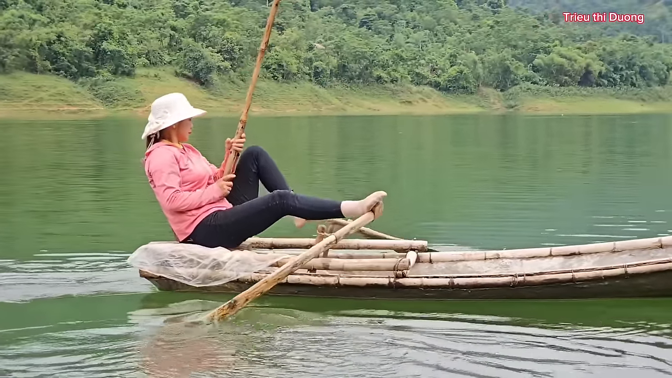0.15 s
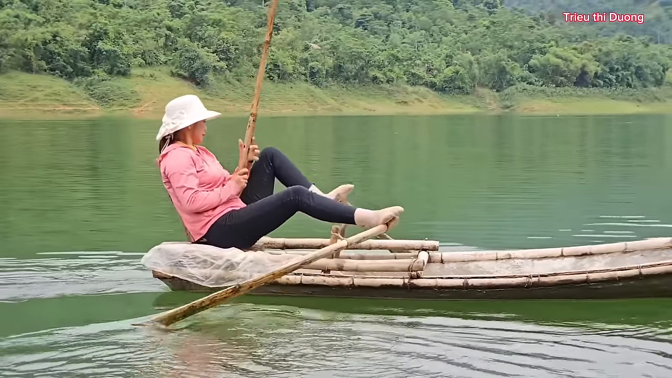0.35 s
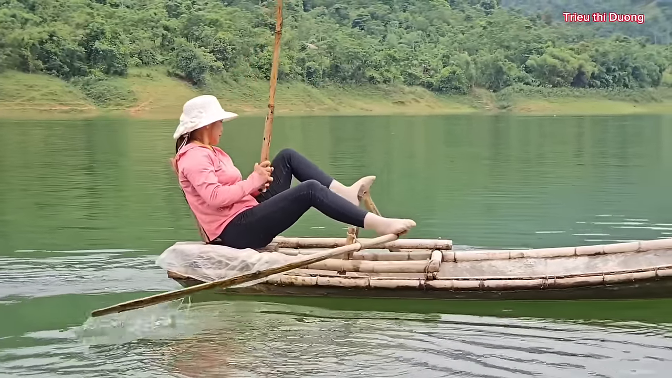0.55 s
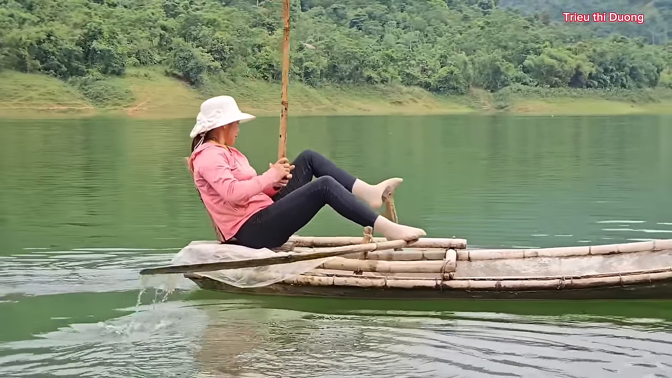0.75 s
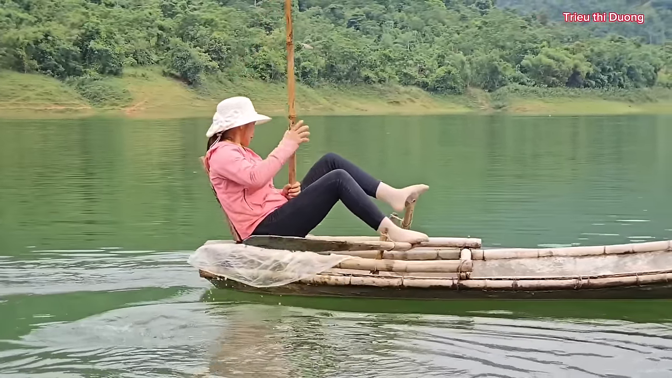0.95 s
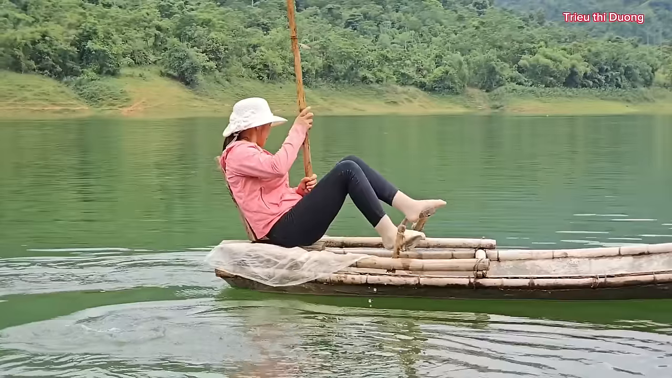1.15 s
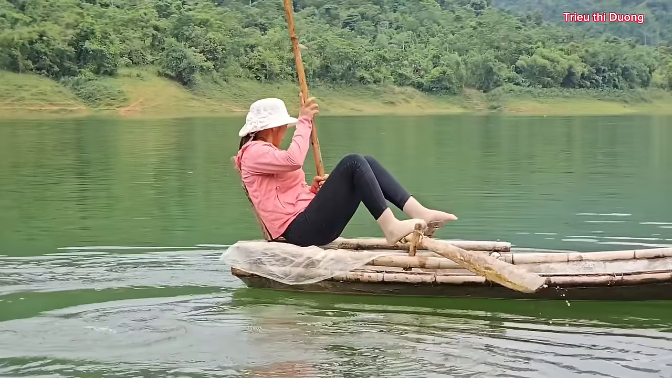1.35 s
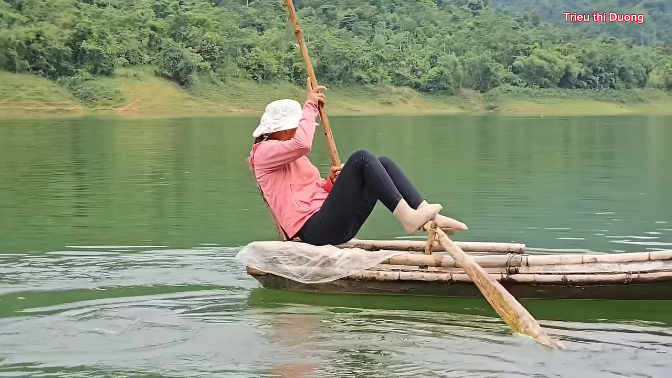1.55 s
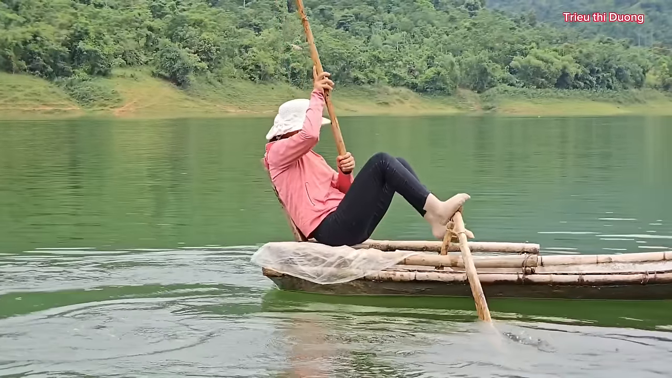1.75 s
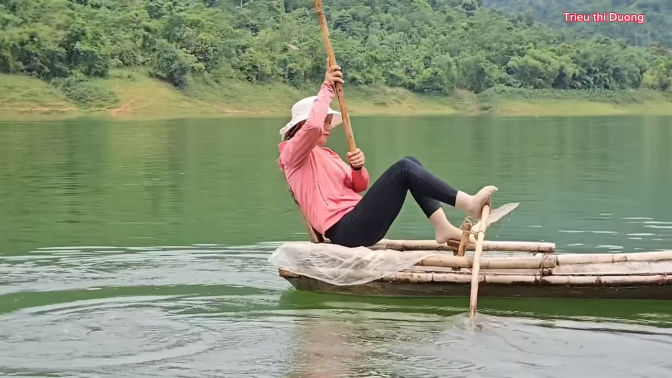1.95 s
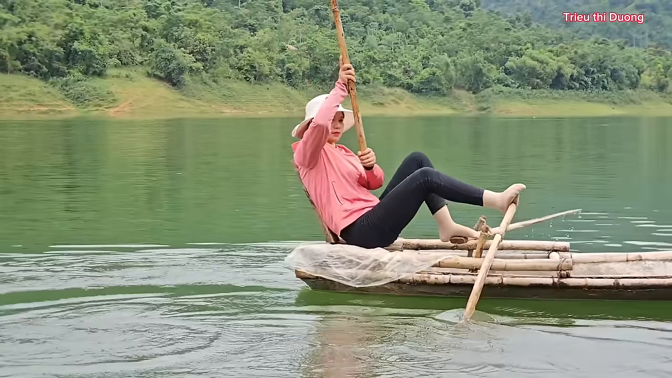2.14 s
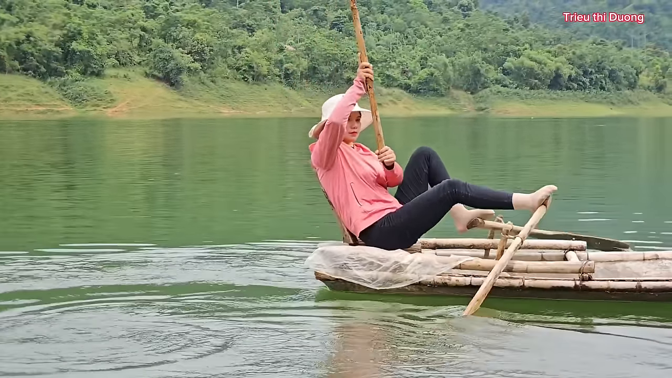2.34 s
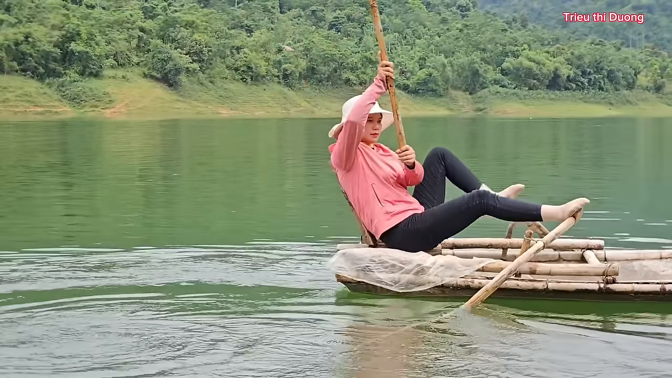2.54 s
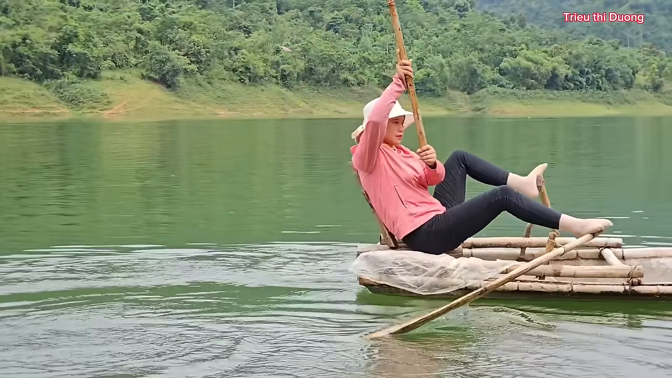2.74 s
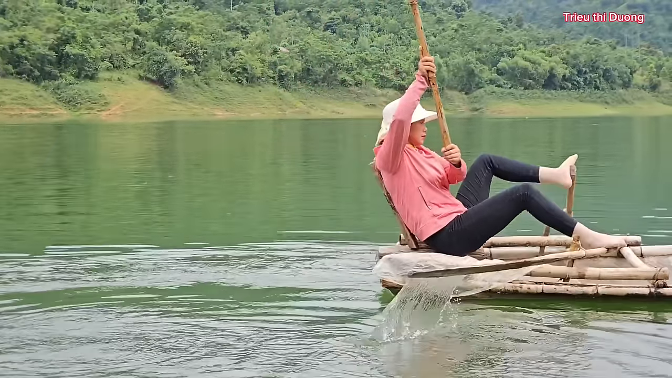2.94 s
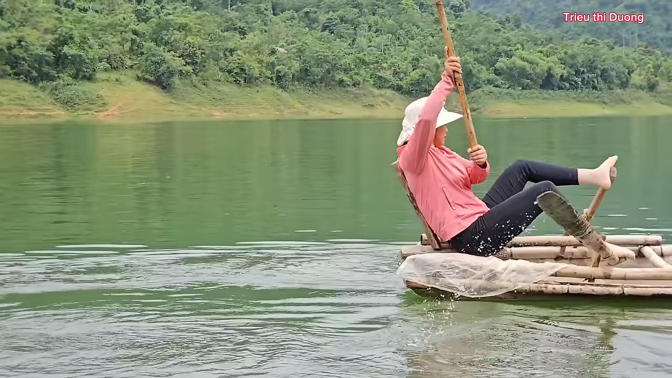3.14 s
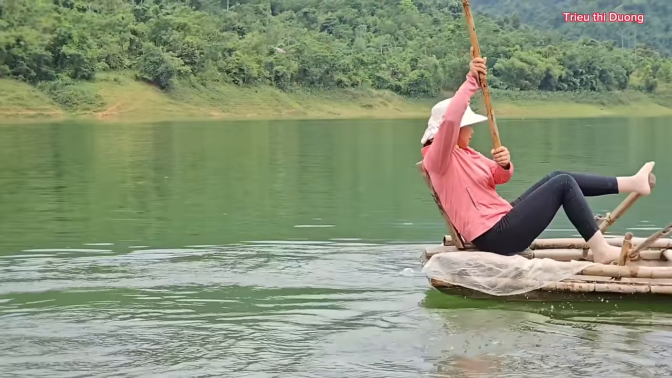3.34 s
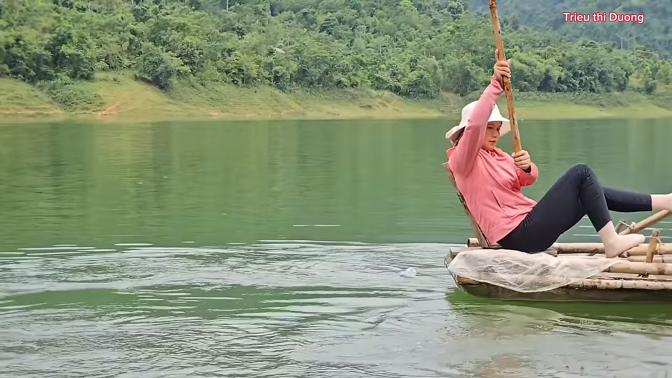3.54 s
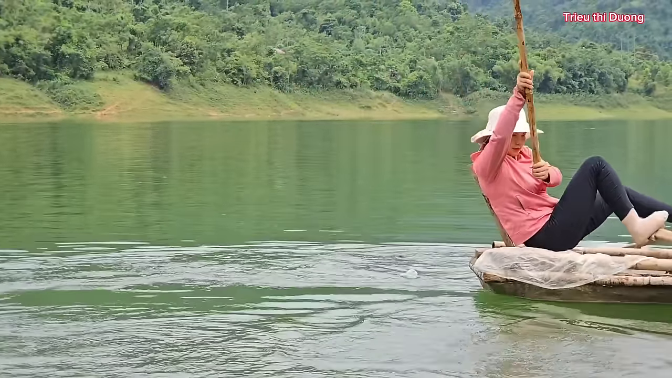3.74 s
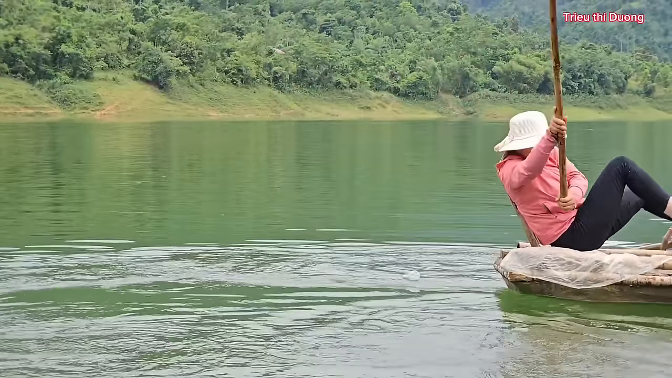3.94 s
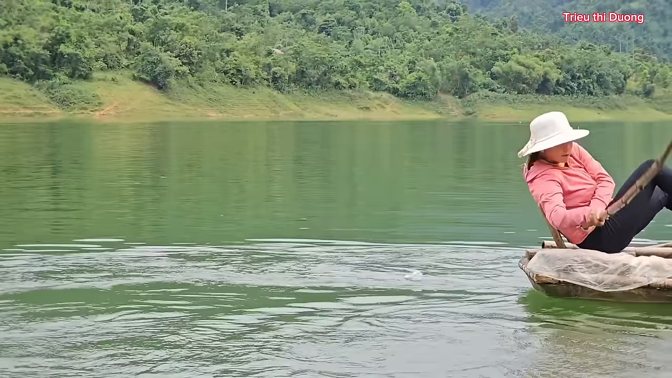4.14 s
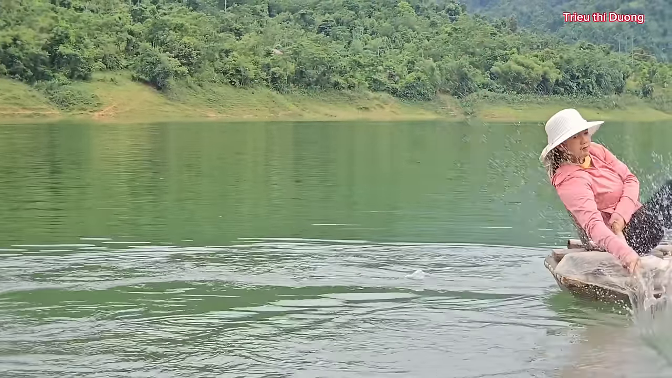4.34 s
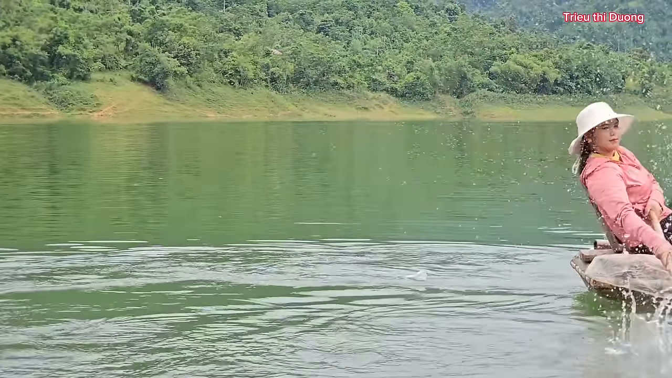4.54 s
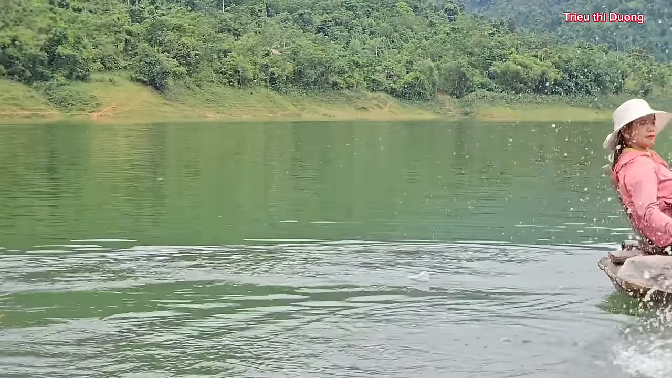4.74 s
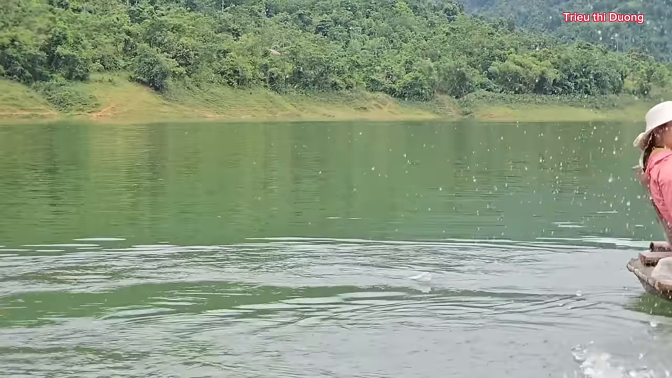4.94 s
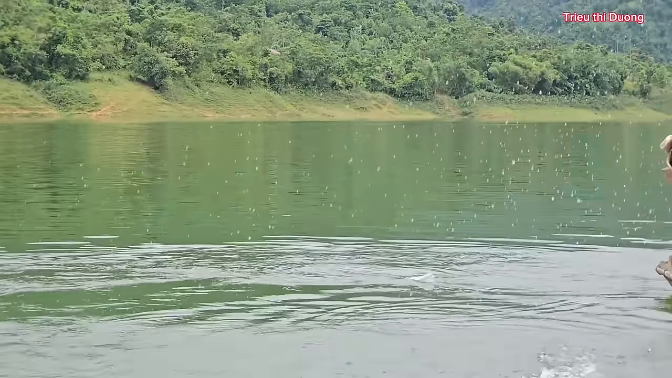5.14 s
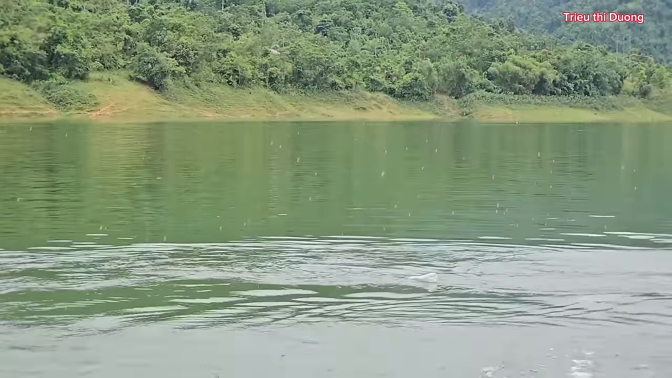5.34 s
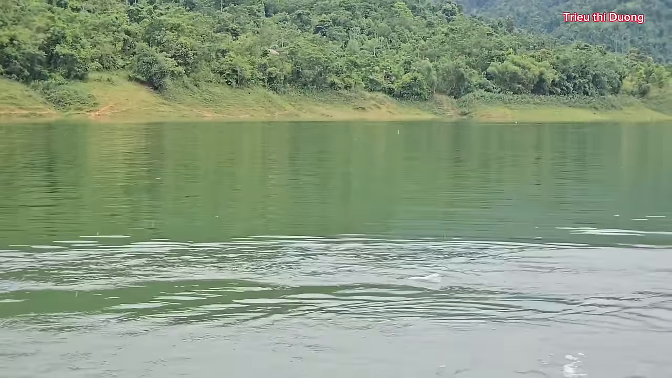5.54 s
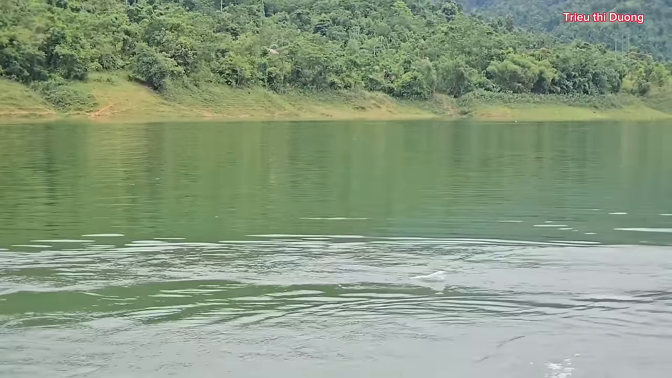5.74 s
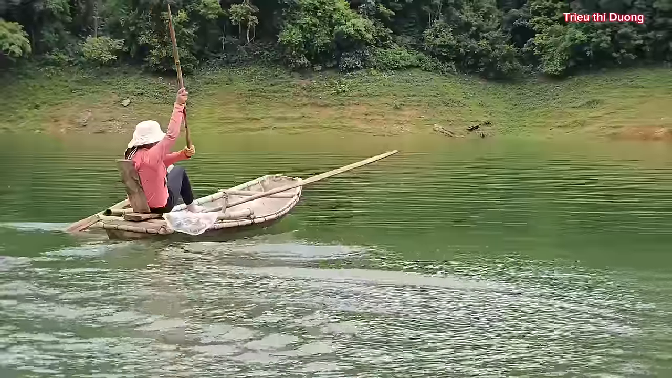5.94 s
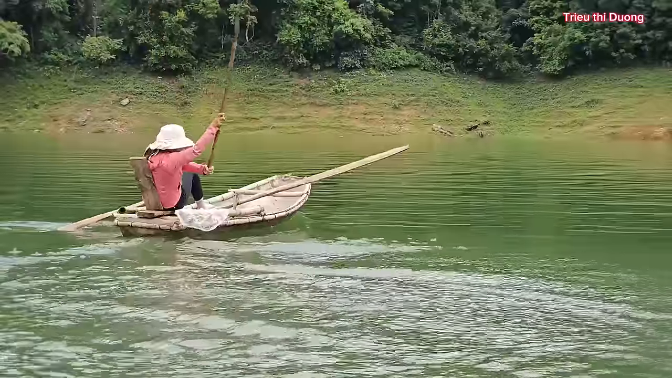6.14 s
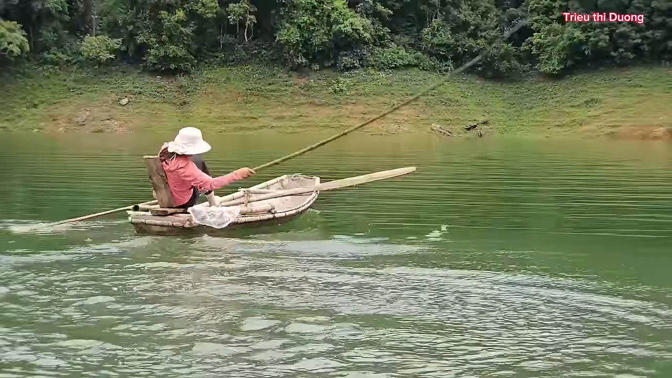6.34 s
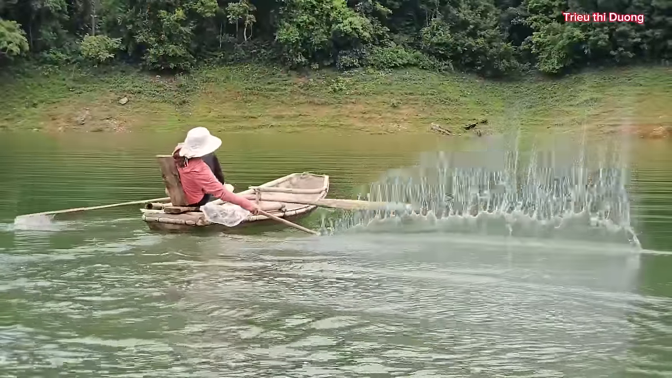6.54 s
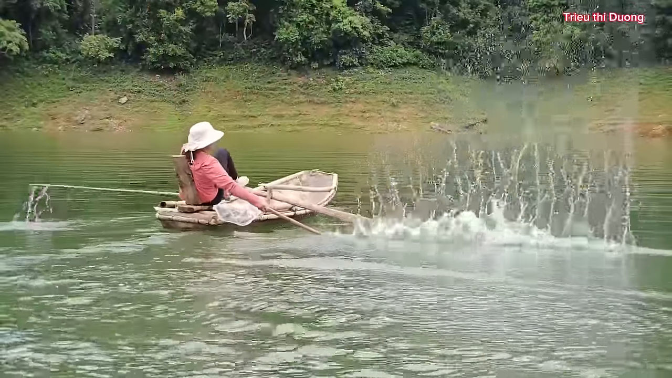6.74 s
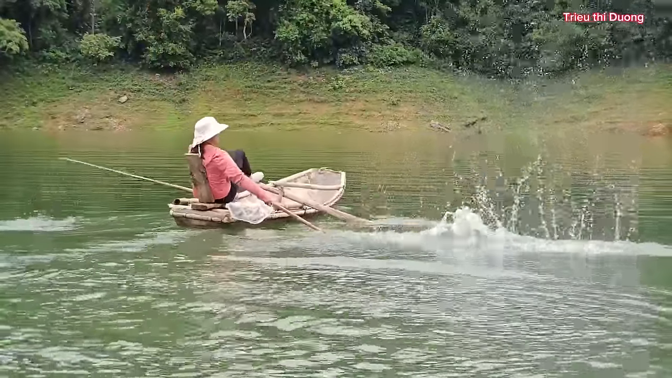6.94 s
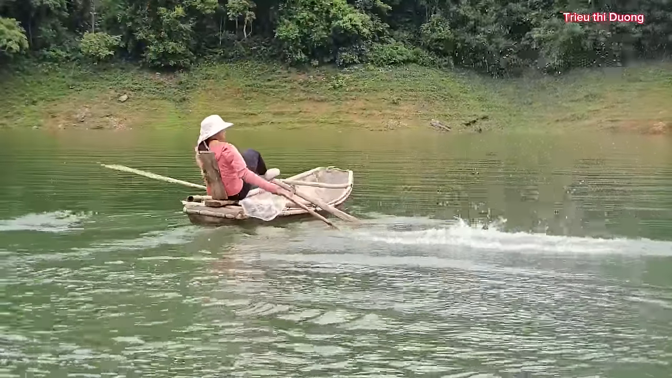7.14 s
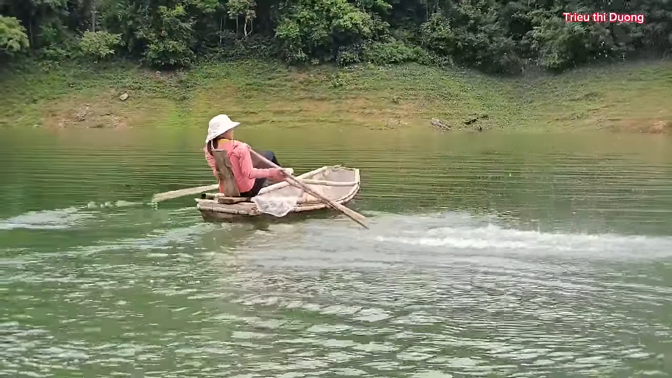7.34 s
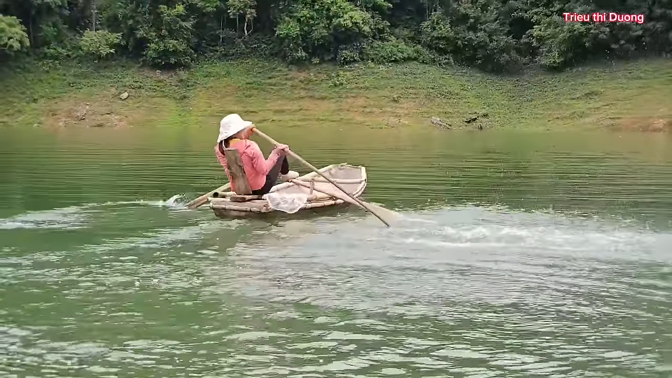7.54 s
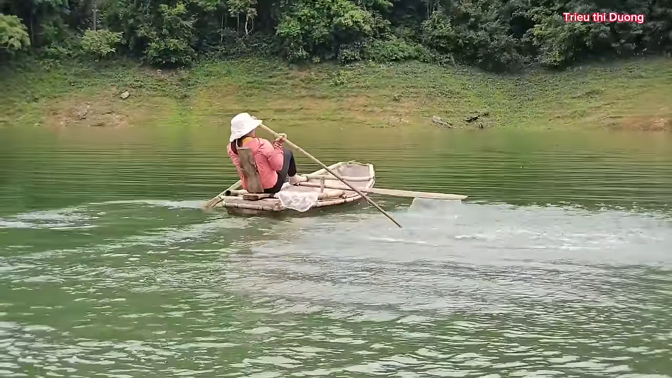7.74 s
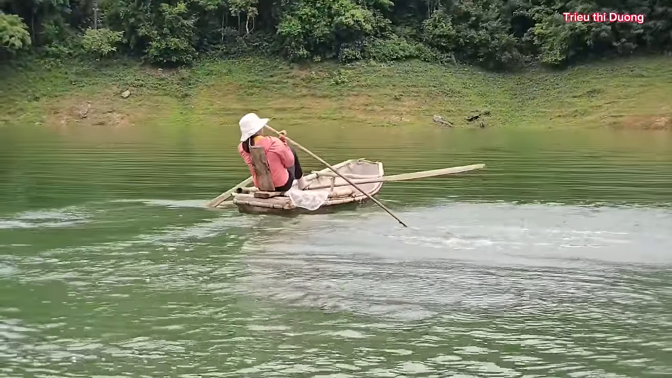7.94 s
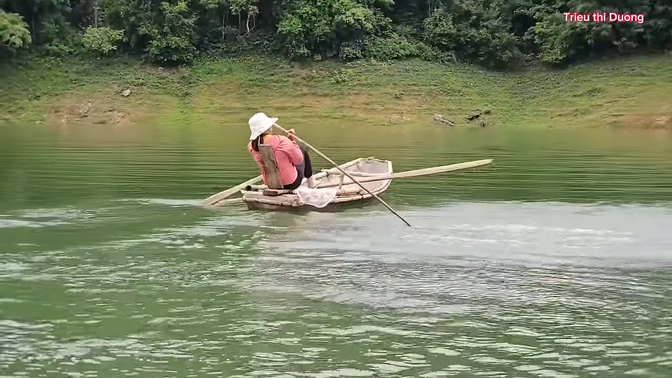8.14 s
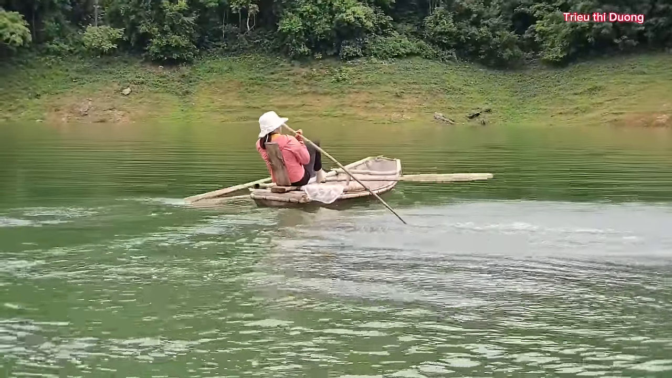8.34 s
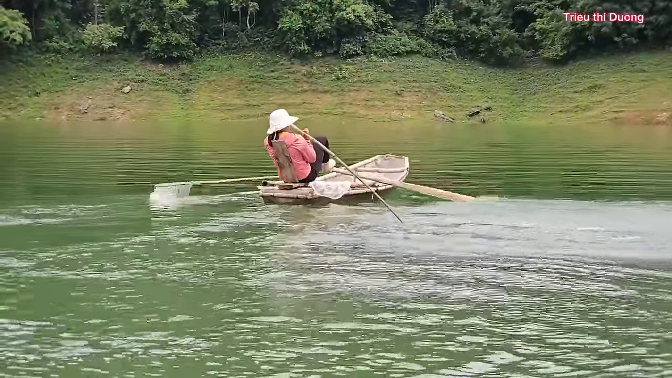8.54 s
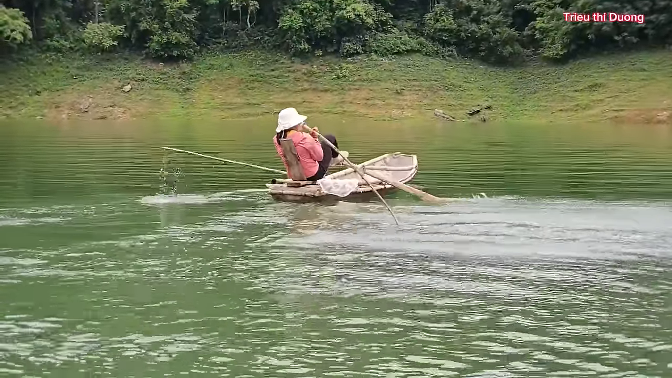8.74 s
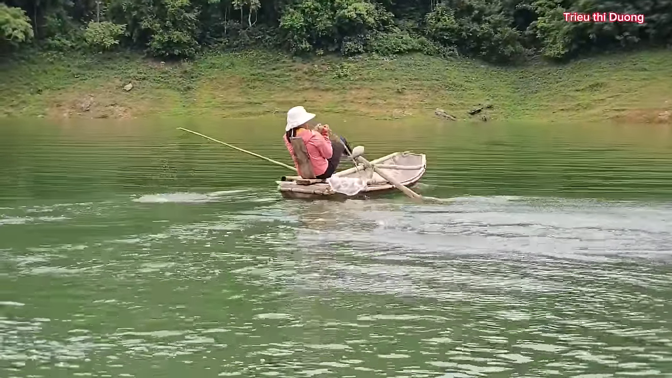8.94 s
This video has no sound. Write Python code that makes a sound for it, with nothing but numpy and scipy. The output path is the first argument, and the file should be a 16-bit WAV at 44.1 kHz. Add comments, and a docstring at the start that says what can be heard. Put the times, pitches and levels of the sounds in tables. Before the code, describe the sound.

Quiet outdoor water ambience: light paddle gurgles, single ringing bubbles and clicking drops, with insects and high birds from a wooded shore. Midway comes a sudden loud slap of a long pole, a hollow gulp and a shower of droplets. A very short total silence separates it from a more distant view, where another slap bursts and showers down before soft oar strokes resume, with slight wind at the microphone.

```python
"""Twice a long bamboo pole beats a calm lake: a swish of eddies, a noise crack, a gulp of air pockets, then spray.
The spray rains back as bubble showers and noise ticks; drops click, and lone bubbles ring as gliding tones.
A small boat is rowed: the water is stirred into showers of bubbles and drips, with short narrow-noise gurgles.
From the wooded shore come insects as coloured noise and thin tones, and small birds as falling chirps.
All sound drops out briefly between the two blows; a faint low knock comes just before that."""
import sys
import numpy as np
from scipy import signal
from scipy.fft import rfft, irfft, next_fast_len
from scipy.io import wavfile

SR = 44100
rng = np.random.default_rng(int(sys.argv[2]) if len(sys.argv) > 2 else 0)


def master(y):
    """Save y as 16-bit WAV."""
    cut = np.clip(np.atleast_2d(y).T, -1, 1)
    pcm = np.round(cut * 32767)  # scale
    wavfile.write(sys.argv[1], SR, pcm.astype(np.int16))


N = 396018
TIME = np.arange(N) / SR

# All colours below: relative noise density, (frequency [Hz], density [dB per Hz])
# the silence: (start [s], end [s])
SILENCE = (5.829, 5.928)
# air and insect chorus before and after the silence: colours
SHORE_BEFORE = [(18, -39.5), (30, -13.5), (110, -1.5), (384, -14), (497, -12), (928, -18.5), (2080, -18),
                (2770, -4.5), (3410, -12), (4650, 3.5), (5730, -12), (7430, -4.5), (9390, -16),
                (10400, -26.5), (15000, -30)]
SHORE_AFTER = [(18, -41), (30, -24.5), (102, 5), (176, -5.5), (267, -2), (346, -12.5), (1650, -8.5),
               (2430, -16.5), (3410, -10.5), (4780, 4.5), (5880, -18), (7430, 1.5), (9890, -26),
               (11300, -18.5), (15000, -28.5)]
# steady breeze: (level before the silence [dB], level after [dB])
BREEZE_DB = (-96, -77.5)
# gusts on the microphone: (time of peak [s], level [dB], width [s])
GUSTS = [(.2, -68.5, .35), (1.3, -79, 0.54), (8.8, -65, 0.14)]
# thin tones of single insects: (time [s], length [s], level [dB], pitch [Hz])
INSECT_TONES = [(0, 0.46, -72, 2740), (1.4, 3.04, -77.5, 2860), (3.303, 0.67, -78.5, 2410)]
# trills of falling chirps: (time [s], chirps [count], level before panning [dB], nominal top pitch [Hz])
TRILLS = [(.71, 4, -62.5, 4650), (1.75, 4, -63, 4750), (2.03, 3, -66, 4500), (2.83, 6, -60.5, 4700),
          (4.05, 3, -63, 4690), (5.929, 1, -48, 4730), (6.999, 6, -52.5, 4700), (8.102, 1, -56, 4750),
          (8.135, 4, -47.8, 4750)]
# a bird's falling whistle: (time [s], level [dB])
WHISTLES = [(-.005, -62), (1.368, -59), (2.665, -60)]
# chorus of far trills, one row before and one after the silence: (mean level [dB], mean top pitch [Hz])
FAR_TRILLS = [(-67, 4880), (-62.5, 5110)]
# swirls behind a blade or the pole: (time [s], length [s], level [dB], first pitch [Hz], last pitch [Hz])
GURGLES = [(0.399, .11, -56, 248.6, 561), (0.713, 0.097, -60.5, 394, 775), (1.68, 0.089, -71, 320, 646),
           (2.189, 0.082, -68.5, 733, 700), (3.41, 0.057, -68, 228, 170), (3.901, 0.063, -71, 330, 400),
           (4.389, .07, -51, 262, 240), (4.481, .13, -52, 230.5, 340), (5.942, 0.056, -67.5, 279, 320),
           (6.204, .08, -59.5, 276, 380), (6.699, .12, -63, 250, 190), (7.723, .11, -64, 500, 750),
           (8.059, 0.072, -70, 278, 378), (8.368, .16, -59.5, 334, 267)]
# stirrings of the water with bubbles and drips, near and far; several may make one stroke;
# levels before the trims in scene():
# (time of full strength [s], hold [s], bubble level [dB], fade [dB per s], drip level [dB])
NEAR_STIRRINGS = [(.135, .05, -64.5, 110.5, -78), (.41, 0.058, -48.5, 44, -65),
                  (1.61, 0.0094, -65, 199, -72.5), (1.70, 0.063, -62.5, 109, -92),
                  (2.505, .045, -60.5, 200, -80), (2.885, .065, -57.5, 75, -71),
                  (3.092, .005, -55, 419.5, -86), (3.205, .01, -64, 299, -74), (3.85, .02, -63, 151.5, -72),
                  (3.935, .055, -55, 330, -69), (4.45, .01, -68, 200, -72)]
FAR_STIRRINGS = [(6.215, .02, -61, 150, -88.5), (6.75, .01, -61, 150, -71), (8.075, .005, -61.5, 260, -73),
                 (8.35, .15, -57.5, 45, -91.5), (8.67, .04, -55.5, 140, -77.5),
                 (8.92, 0.067, -64, 100, -92)]
# colours of the near and far wash, and of the drips
NEAR_WASH_COLOUR = [(88, -57), (150, -27.5), (248, -6.5), (399, -18), (446, -10), (684, -4), (971, -8.5),
                    (1230, 3.5), (1450, -10), (1710, 0.5), (3000, -13), (3900, -53), (6600, -120)]
FAR_WASH_COLOUR = [(120, -27.5), (280, 2), (550, 1), (900, -2.5), (1500, -3.5), (2400, -12), (4000, -51)]
DRIP_COLOUR = [(1500, -9.5), (2500, 0.5), (4000, 6), (8000, 0.5), (10500, -7), (15500, -4)]
# single bubbles trapped by blades and falling water:
# (time [s], level before the trims in scene() [dB], first pitch [Hz], ring t60 [s])
PLOPS = [(0.174, -39.5, 1227, 0.044), (0.254, -51, 1247, 0.077), (0.393, -25.5, 726, 0.019),
         (0.405, -36, 662, .048), (0.451, -40.5, 1230, .05), (0.467, -35.5, 696, 0.046),
         (0.537, -29.5, 1080, 0.019), (0.654, -48, 1250, .055), (0.673, -44, 1110, 0.027),
         (0.77, -52.5, 1130, .064), (0.859, -58, 1290, .045), (0.9, -60, 1310, .055),
         (1.025, -47.5, 1233, 0.052), (1.379, -60.5, 1080, .068), (1.686, -50.5, 637, 0.038),
         (1.725, -56.5, 633, .068), (1.797, -53.5, 723, 0.094), (1.967, -48.5, 1240, 0.026),
         (2.135, -54, 1770, 0.02), (2.863, -50, 1140, 0.041), (2.923, -48, 614, 0.064),
         (3.088, -49, 830, 0.091), (3.236, -58, 1660, .055), (3.874, -44.5, 1690, 0.035),
         (3.962, -42, 1800, 0.035), (4.002, -48.5, 770, 0.042), (5.421, -43.5, 1202, 0.04),
         (5.533, -53.5, 1174, .064), (5.96, -54, 715, 0.047), (6.216, -42, 1573, .019),
         (6.266, -53, 1025, .046), (7.475, -41, 740, 0.048), (7.687, -48, 1290, 0.035),
         (7.737, -51, 567, 0.065), (7.824, -53.5, 680, 0.038), (8.258, -42.5, 1190, 0.016),
         (8.35, -44, 450, 0.057), (8.406, -38.5, 680, 0.034), (8.459, -46, 736, .051),
         (8.487, -36.5, 516, 0.033)]
# single bubbles ringing during the blow and the spray, each with its own pitch glide:
# (time [s], level before the trims in scene() [dB], first pitch [Hz], ring t60 [s], pitch glide over the t60 [share])
BLOW_BUBBLES = [(4.268, -12, 567, 0.021, 0.34), (4.329, -27.5, 473, 0.086, -.23),
                (4.391, -28.5, 1265, 0.028, -.043), (4.406, -20.5, 502, 0.037, -.064),
                (4.688, -19, 550, 0.04, 0.97), (4.734, -21.5, 563, 0.025, 1),
                (4.872, -28.5, 1240, 0.033, -0.07), (4.898, -27.5, 1255, 0.038, .1),
                (6.562, -25, 660, 0.025, .081), (6.67, -26.5, 976, 0.032, .043),
                (6.690, -25.5, 716, 0.049, -0.083), (6.8315, -40, 555, 0.061, -0.034),
                (6.904, -28, 399, 0.036, 0.86), (7.105, -24.5, 554, .026, 0.26)]
# colour of the splash that traps a bubble
SPLASH_COLOUR = [(150, -18), (400, -6), (700, 6.5), (1300, -5.5), (2000, -11), (3000, -16.5),
                 (15000, -38.5)]
# single drops, levels before the trims in drops(): (time [s], level [dB])
DROPS = [(0.087, -48.5), (0.45, -39.5), (0.5845, -47), (0.602, -42.5), (1.676, -49.5), (2.426, -45),
         (3.013, -50), (3.089, -42), (3.1422, -49), (3.207, -49), (3.7563, -52), (3.843, -44.5),
         (3.962, -39.5), (4.541, -36.5), (4.6029, -38.5), (5.1806, -34.5), (5.229, -38.5), (5.2953, -41),
         (5.413, -35.5), (5.476, -40.5), (5.5066, -38), (5.5243, -45), (7.455, -37.5)]
# colour of a drop
DROP_COLOUR = [(300, -24), (1500, -5), (3000, -4.5), (4400, 4.5), (6000, -6), (7400, 7.5), (10000, -6.5),
               (15500, -4)]
# thrown water landing: first landing [s], length [s], then rows for deep churn, bubbles and drop ticks:
# (level [dB], attack [s], hold [s], sag in the hold [dB per s], final fade [dB per s])
NEAR_SPRAY = 4.43, 1.4, [(-46.5, 0.59, .17, 2, 129), (-37, 0.32, 0.47, 16, 86),
              (-42.5, 0.35, 0.63, 19.5, 21)]
FAR_SPRAY = 6.783, 1.35, [(-53, 0.53, .15, 4, 150), (-42.5, 0.19, 0.52, 15.5, 52),
             (-46, 0.23, 0.26, 24.5, 21.6)]
# colours of the near and far spray
NEAR_SPRAY_COLOUR = [(59, -59.5), (100, -26), (238, -1), (378, -13), (654, -4.5), (936, -8), (1230, -7.5),
                     (1490, -10), (1840, -10), (2580, -16.5), (4460, -15.5), (6530, -23.5), (7410, -18),
                     (10600, -26), (15500, -23)]
FAR_SPRAY_COLOUR = [(59, -46.5), (100, -22.5), (287, -2), (386, -14.5), (429, -6.5), (627, -4.5),
                    (861, -7.5), (1620, -4.5), (1840, -10.5), (3460, -10.5), (4460, -7), (6000, -16.5),
                    (7410, -9), (8580, -17), (15500, -21.5)]
# the pole sweeping through the air, one curve per blow: (time [s], level [dB], eddy pitch [Hz])
SWINGS = [
    [(4.1, -72.5, 171), (4.2, -65.5, 233), (4.26, -43.5, 310)],
    [(6.33, -63.5, 175), (6.43, -58, 222.6), (6.48, -51, 290), (6.515, -44, 354)],
]
# the pole hitting the water: (time [s], crack level [dB], crack t60 [s], body level [dB], body t60 [s])
SLAPS = [(4.258, -8.5, 0.02, -21, 0.099), (6.5145, -8.5, 0.011, -29, 0.11)]
# colours of the crack and body, the near blow first, then the far one
CRACK_COLOURS = [
    [(59, -36), (100, 4), (403, -7), (898, -27), (1840, 0.5), (3390, -24), (3930, -0.5), (5510, -12.5),
     (7250, -2.5), (10400, -14.5), (15500, -8.5)],
    [(59, -40), (100, -20.5), (682, 2.5), (2870, -14.5), (4460, -4.5), (6660, -13.5), (7560, 5.5),
     (8230, -15.5), (10600, -15), (14200, -14), (15500, -14)],
]
BODY_COLOURS = [
    [(59, -40), (100, -1.5), (386, -14.5), (552, -2), (1060, -13.5), (1310, -4.5), (2930, -15.5),
     (3120, -29.5), (3850, -19.5), (15500, -27)],
    [(59, -29), (100, -1), (477, -0.5), (879, -3), (1060, 1.5), (2220, -3.5), (2370, -17.5), (3850, -0.5),
     (4460, -11.5), (15500, -17.5)],
]
# water rushing into the furrow: (time of peak [s], level [dB], swell [s], t60 [s])
RUSHES = [(4.275, -31, 0.0021, 0.14), (4.366, -29, .011, 0.14), (6.607, -30, .001, 0.089),
          (6.624, -27.5, .004, 0.2)]
# colour of the rush
RUSH_COLOUR = [(120, -36.5), (200, 2), (371, -21), (454, -8), (957, -18.5), (1680, -20.5), (1910, -28.5),
               (2090, -27.5), (4840, -33.5), (7350, -29), (15500, -49.5)]
# air pockets closing, and one faint low knock at 5.778 s:
# (time of envelope peak [s], level [dB], pitch [Hz], swell [s], t60 [s])
GULPS_AND_KNOCK = [(4.2568, -26, 86, 0.0016, 0.029), (4.3641, -18.5, 242, 0.0065, 0.038),
                   (4.38, -26.5, 178, 0.0029, 0.046), (5.778, -44.5, 69.5, 0.0029, 0.051),
                   (6.5187, -22.5, 130, 0.001, 0.02), (6.6061, -25, 215, 0.0042, 0.055),
                   (6.622, -16.5, 224, 0.0036, 0.03), (6.627, -28.5, 117, 0.0065, 0.13),
                   (6.685, -29.5, 270.5, .012, 0.042)]
# left-right likeness of water and shore: (frequency [Hz], coherence [0-1])
WATER_SAME = [(100, 0.99), (600, 0.88), (1400, 0.88), (3000, 0.7), (7000, .05)]
SHORE_SAME = [(100, .88), (300, 0.44), (700, 0.011), (1400, 0), (3000, 0)]
# colour difference of the two microphone ports: (frequency [Hz], left minus right [dB])
PORTS = [(1200, 0.5), (2800, 0), (4400, -5), (5900, 2), (7400, -10), (8800, 1), (14000, -3.5)]

CHIRP_GAP_S, TONE_FADE_S = .0372, .044
PLOP_RISE = .125  # share by which a plop's pitch rises over its t60
STIR_ATTACK_S = .035  # build-up of the stirred bubbles
# drips start sooner, hold longer and fade at this share of the bubbles' rate
DRIP_LEAD_S, DRIP_LINGER_S, DRIP_FADE = .1, .05, .73
SILENT_DB = 36  # a stirring runs until its bubbles have faded by at least this much
SPRAY_BUILD = 1.48  # the spray's attack grows as this power of time


def amp(db):
    """Decibels to gain."""
    return 10 ** (np.asarray(db) / 20)


def evened(x):
    """Scales a sound so that its middle channel has rms 1."""
    middle = np.atleast_2d(x).mean(0)
    return x / np.sqrt(np.mean(middle ** 2) + 1e-20)


def read(points, hz):
    """Reads a table along a log-frequency axis."""
    f, value = np.transpose(points)
    return np.interp(np.log(hz + 1), np.log(f + 1), value)


def add(mix, s, sound):
    """Lays a sound into the stereo mix at time s, or at the start if s is negative."""
    part = mix[:, max(round(s * SR), 0):][:, :sound.shape[-1]]
    part += sound[..., :part.shape[1]]


def follow(rows):
    """Start time, size and columns of a curve table, sample by sample."""
    s, *columns = np.transpose(rows)
    t = np.arange(round(s[0] * SR), round(s[-1] * SR)) / SR
    return s[0], len(t), [np.interp(t, s, column) for column in columns]


def envelope(t, attack, hold, fade, sag=0, build=1):
    """Gain that grows over the attack, sags through the hold, then fades; sag and fade in dB per s."""
    held = np.clip(t - attack, 0, hold)
    fading = np.maximum(t - attack - hold, 0)
    return np.clip(t / attack, 0, 1) ** build * amp(-sag * held - fade * fading)


def shaped(x, colour, same=None):
    """Gives two channels a spectrum and, if asked, a left-right likeness per frequency."""
    size = next_fast_len(x.shape[1])
    z, hz = rfft(x, size), np.fft.rfftfreq(size, 1 / SR)
    if same:
        # blending each side with the other by this angle gives the coherence asked for
        turn = np.arcsin(np.clip(read(same, hz), -1, 1)) / 2
        z = np.cos(turn) * z + np.sin(turn) * z[::-1]
    return evened(irfft(z * amp(read(colour, hz)), size)[:, :x.shape[1]])


def noise(size, colour, same=WATER_SAME):
    """Coloured stereo noise."""
    return shaped(rng.standard_normal((2, size)), colour, same)


def band(x, lo_hz, hi_hz):
    """One band of a sound, at rms 1."""
    edges = [lo_hz, min(hi_hz, SR / 2 - 1)]
    return evened(signal.sosfilt(signal.butter(3, edges, "band", fs=SR, output="sos"), x))


def whistle(hz, width_hz):
    """Noise in a narrow resonance that follows a pitch curve."""
    lowpass = signal.butter(2, width_hz / 2, fs=SR, output="sos")
    wander = signal.sosfilt(lowpass, rng.standard_normal((2, len(hz))))
    carrier = np.exp(2j * np.pi * np.cumsum(hz) / SR)
    return evened(((wander[0] + 1j * wander[1]) * carrier).real)


def burst(colour, swell, t60):
    """Noise that swells to a peak and dies; returns the time of the peak and the sound."""
    lead = 5 * swell
    t = np.arange(int((lead + t60) * SR)) / SR - lead
    shape = np.exp(np.minimum(t / swell, -t * np.log(1000) / t60))
    sound = noise(SR // 2, colour)[:, :len(t)] * shape
    return lead, evened(sound) * np.sqrt(np.mean(shape ** 2))


def bubble(hz, t60, glide, onset, apart_hz=2300):
    """A dying ring that glides in pitch; the higher it is, the more its phase differs between the ears."""
    t = np.arange(int(t60 * SR) + 2) / SR
    phase = 2 * np.pi * hz * t * (1 + glide * t / t60 / 2)
    offset = rng.standard_normal() * hz / apart_hz * np.array([[.5], [-.5]])
    rise = 1 - np.exp(-t * hz / onset)  # onset in cycles
    return np.sin(phase + offset) * rise * 1000 ** (-t / t60)


def patter(size, per_s, lo_hz, hi_hz, cycles, spread_db, count=40):
    """A random shower of bubbles of many sizes, even in energy per Hz; most rise in pitch as they surface."""
    out = np.zeros((2, size))
    for hz in np.geomspace(lo_hz, hi_hz, count):
        t60 = cycles * rng.uniform(.9, 2) / hz
        ring = bubble(hz * rng.uniform(.936, 1.05), t60, rng.uniform(-.15, .53), onset=.39)
        chance, strength = rng.random((2, size))
        at = np.flatnonzero(chance < per_s / count / SR)
        sizes = hz * amp(spread_db * np.minimum(-np.log(strength[at]), 3))
        signs = (-1) ** at
        for i, gain in zip(at, sizes * signs):
            add(out, i / SR, gain * ring)
    return evened(out)


def bounce(x, delay=.00169, share=.35):
    """One close reflection gives the water a hollow colour."""
    t = np.arange(x.shape[1]) / SR
    reflection = np.array([np.interp(t - delay, t, side, left=0) for side in x])
    return evened(x + share * reflection)


def breeze():
    """Low rumbling noise: a steady breeze with a few smooth gusts."""
    wind = amp(np.where(TIME < SILENCE[0], *BREEZE_DB))
    for s, db, width in GUSTS:
        wind = wind + amp(db) * np.exp(-((TIME - s) / width) ** 2)
    return wind * noise(N, [(15, -11), (30, -3), (70, -15), (150, -26), (600, -66.5)])


def insect_tones(width_hz=55):
    """Single insects hold thin tones, each a narrow band of noise."""
    out = np.zeros((2, N))
    for s, length, db, hz in INSECT_TONES:
        size = int(length * SR)
        ends = signal.windows.tukey(size, 2 * TONE_FADE_S / length)
        add(out, s, amp(db) * whistle(np.full(size, hz), width_hz) * ends)
    return out


def shore(before_db=-62.66, after_db=-63.5):
    """Insects hiss in several bands of noise over soft air, with thin tones and a breeze."""
    before = amp(before_db) * noise(N, SHORE_BEFORE, SHORE_SAME)
    after = amp(after_db) * noise(N, SHORE_AFTER, SHORE_SAME)
    return np.where(TIME < SILENCE[0], before, after) + breeze() + insect_tones()


def chirp(top_hz, fall, length, overtone_db=-24):
    """A short falling note with a weak octave."""
    u = np.linspace(0, 1, int(length * SR))
    phase = 2 * np.pi * np.cumsum(top_hz * (1 - fall * u)) / SR
    return np.sin(np.pi * u) ** 2 * (np.sin(phase) + amp(overtone_db) * np.sin(2 * phase))


def birds(left_db=-9, right_db=6):
    """Trills from the right, two-note falling whistles, and fainter trills all along the shore."""
    out = np.zeros((2, N))
    for s, count, db, hz in TRILLS:
        sides = amp([[db + left_db], [db + right_db]])
        for k in range(count):
            add(out, s + k * CHIRP_GAP_S, sides * chirp(hz * rng.uniform(.96, 1.005), .0858, .034))
    for s, db in WHISTLES:
        add(out, s, amp(db) * chirp(3200, .22, .04))
        add(out, s + .018, amp(db - 7) * chirp(2600, .19, .06))
    for s in np.arange(0, N / SR, .027):
        db, hz = FAR_TRILLS[int(s > SILENCE[0])]
        note = chirp(hz * rng.uniform(.975, 1.025), .11, .019)
        sides = amp(db + 2.2 * rng.standard_normal((2, 1)))
        add(out, s + rng.uniform(0, .0062), sides * note)
    return out


def lake(x, echo_db=-24, t60=.55):
    """A faint scatter from the hull and the ripples: a dying noise tail."""
    t = np.arange(SR // 2) / SR
    tail = noise(len(t), [(100, -4), (700, -2.5), (3000, -10.5), (15000, -18.5)])
    tail = tail * np.exp(-t * np.log(1000) / t60)
    echo = signal.oaconvolve(x, tail / np.linalg.norm(tail[0]), axes=1)[:, :N]
    return x + amp(echo_db) * echo


def gurgles(width_hz=110):
    """Eddies gurgle: a swirl of like-sized bubbles sings a short rough glide."""
    out = np.zeros((2, N))
    for s, length, db, first_hz, last_hz in GURGLES:
        size = int(length * SR)
        glide = whistle(np.geomspace(first_hz, last_hz, size), width_hz)
        add(out, s, amp(db) * glide * signal.windows.tukey(size, .5))
    return out


def stirrings(rows, colour, bubbles_db, drips_db, smooth_db, hollow):
    """Stirred water: showers of bubbles over smooth wash noise, and a trickle of drips."""
    out = np.zeros((2, N))
    for s, hold, stir_db, fade, drip_db in rows:
        size = int((DRIP_LEAD_S + hold + DRIP_LINGER_S + SILENT_DB / fade) * SR)
        t, ends = np.arange(size) / SR, signal.windows.tukey(size, .05)
        churn = shaped(patter(size, 600, 220, 2600, cycles=27, spread_db=3), colour)
        bubbles = bounce(churn + amp(smooth_db) * noise(size, colour), share=hollow)
        drips = shaped(patter(size, 2000, 2500, 15000, cycles=5, spread_db=4), DRIP_COLOUR)
        stir_gain = amp(stir_db + bubbles_db) * envelope(t, STIR_ATTACK_S, hold, fade, build=2)
        drip_shape = envelope(t, DRIP_LEAD_S, hold + DRIP_LINGER_S, fade * DRIP_FADE)
        add(out, s - STIR_ATTACK_S, stir_gain * bubbles * ends)
        add(out, s - DRIP_LEAD_S, amp(drip_db + drips_db) * drip_shape * drips * ends)
    return out


def drops(level_db=-7, t60=.045, click_db=2):
    """Large drops land with a sharp click and a brief fizz."""
    out = np.zeros((2, N))
    middle = SR // 200
    impulse = np.array([np.arange(2 * middle) == middle] * 2, float)
    click = shaped(impulse, DROP_COLOUR)
    click = click / abs(click).max()
    for s, db in DROPS:
        add(out, s - middle / SR, amp(db + click_db) * click)
        add(out, s, amp(db + level_db) * burst(DROP_COLOUR, .0001, t60)[1])
    return out


def plops(rows, level_db, splash_db, splash_t60, onset):
    """Each is one ringing bubble and the small splash that traps it; rows without a glide all rise alike."""
    out = np.zeros((2, N))
    for s, db, hz, t60, *glide in rows:
        ring = bubble(hz, t60, glide[0] if glide else PLOP_RISE, onset)
        add(out, s, amp(db + level_db) * ring)
        add(out, s, amp(db + splash_db) * burst(SPLASH_COLOUR, .00052, splash_t60)[1])
    return out


def spray(landing, colour, mist_db, hollow, lag):
    """Thrown water rains back: impact ticks, small bubbles and deep churning; the left ear hears it lag s later."""
    s, length, parts = landing
    size = int(length * SR)
    t = np.arange(size) / SR
    deep, middle, high = (amp(db) * envelope(t, attack, hold, fade, sag, SPRAY_BUILD)
                          for db, attack, hold, sag, fade in parts)
    shower = patter(size, 2800, 140, 3000, cycles=13, spread_db=3.1, count=60)
    bubbles = bounce(shaped(shower, colour), share=hollow)
    chance, strength = rng.random((2, size))
    impacts = (chance < 600 / SR) * amp(4.5 * np.minimum(-np.log(strength), 3.5))  # 600 per s on average
    splat = np.geomspace(1, .03, 90)  # decay of one impact, in samples
    splats = np.convolve(impacts, splat)[:size] * rng.standard_normal((2, size))
    ticks = shaped(splats, colour) + amp(mist_db) * noise(size, colour)
    sound = deep * band(bubbles, 85, 387)
    sound += middle * band(bubbles, 360, 2800)
    sound += high * band(ticks, 2480, 20100)
    sound[0] = np.roll(sound[0], round(lag * SR))
    out = np.zeros((2, N))
    add(out, s, sound * signal.windows.tukey(size, .02))
    return out


def pulse(hz, swell, t60):
    """A volume pulses as a swelling and dying tone; the sound is the rate of that change."""
    t = np.arange(-SR // 10, SR // 10) / SR
    shape = np.exp(np.minimum(t / swell, -t * np.log(1000) / t60))
    volume = shape * np.sin(2 * np.pi * hz * t)
    return t[0], -np.gradient(volume, t) / (2 * np.pi * hz)


def gulps_and_knock():
    """Air pockets gulp shut as low pulses; one faint low knock is made the same way."""
    out = np.zeros((2, N))
    for s, db, hz, swell, t60 in GULPS_AND_KNOCK:
        start, sound = pulse(hz, swell, t60)
        add(out, s + start, amp(db) * sound)
    return out


def pole(swing_width_hz=170):
    """A swish of narrow noise, a crack and body of noise on the surface, then water rushing into the furrow."""
    out = np.zeros((2, N))
    for rows in SWINGS:
        s, size, (db, hz) = follow(rows)
        add(out, s, amp(db) * whistle(hz, swing_width_hz) * signal.windows.tukey(size, .1))
    for slap, crack_colour, body_colour in zip(SLAPS, CRACK_COLOURS, BODY_COLOURS):
        s, crack_db, crack_t60, body_db, body_t60 = slap
        add(out, s - .001, amp(crack_db) * burst(crack_colour, .0003, crack_t60)[1])
        add(out, s - .001, amp(body_db) * burst(body_colour, .0014, body_t60)[1])
    for s, db, swell, t60 in RUSHES:
        lead, sound = burst(RUSH_COLOUR, swell, t60)
        add(out, s - lead, amp(db) * sound)
    return out


def scene():
    """Water sounds over the life of the shore."""
    water = pole() + gulps_and_knock() + drops() + gurgles()
    water += stirrings(NEAR_STIRRINGS, NEAR_WASH_COLOUR, bubbles_db=-2, drips_db=3.5, smooth_db=-7.5, hollow=.24)
    water += stirrings(FAR_STIRRINGS, FAR_WASH_COLOUR, bubbles_db=-5.5, drips_db=8, smooth_db=-6.5, hollow=.1)
    water += plops(PLOPS, level_db=3, splash_db=-20, splash_t60=.094, onset=1.3)
    water += plops(BLOW_BUBBLES, level_db=2, splash_db=-16.5, splash_t60=.08, onset=1.8)
    water += spray(NEAR_SPRAY, NEAR_SPRAY_COLOUR, mist_db=4.5, hollow=.3, lag=.00011)
    water += spray(FAR_SPRAY, FAR_SPRAY_COLOUR, mist_db=2.5, hollow=.073, lag=.00003)
    return lake(water) + birds() + shore()


def record(dry, low_cut_hz=28, ceiling=.85, edge_hz=15900):
    """Two microphone ports colour the sides differently; low cut, rounded peaks, brief silence, treble limit."""
    size = next_fast_len(N)
    tilt_db = read(PORTS, np.fft.rfftfreq(size, 1 / SR)) / 2
    heard = irfft(rfft(dry, size) * amp([tilt_db, -tilt_db]), size)[:, :N]
    heard = signal.sosfilt(signal.butter(2, low_cut_hz, "high", fs=SR, output="sos"), heard)
    heard = ceiling * np.tanh(heard / ceiling)
    heard = heard * ((TIME < SILENCE[0]) | (TIME > SILENCE[1]))
    treble_limit = signal.firwin(511, edge_hz, window=("kaiser", 9), fs=SR)
    return signal.oaconvolve(heard, treble_limit[None], "same")


dry = scene()
out = record(dry)
master(out)
```